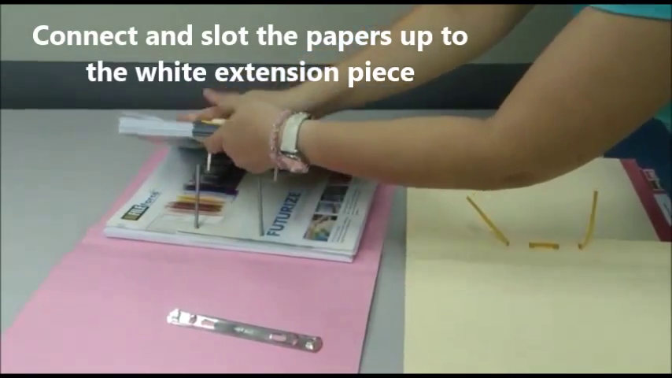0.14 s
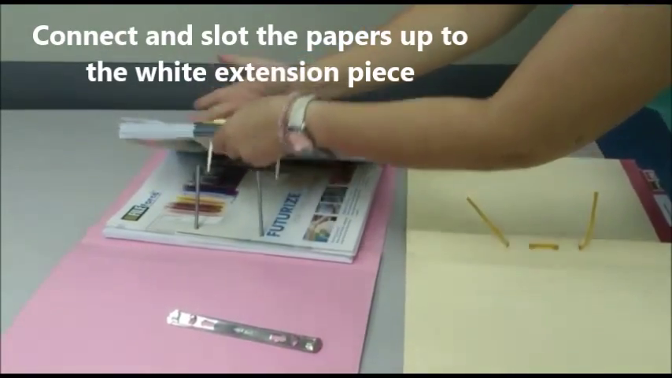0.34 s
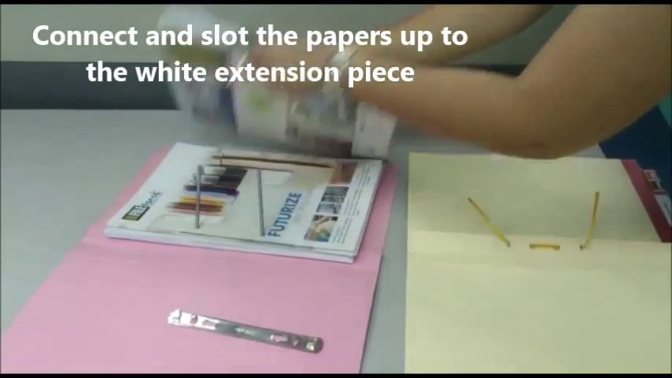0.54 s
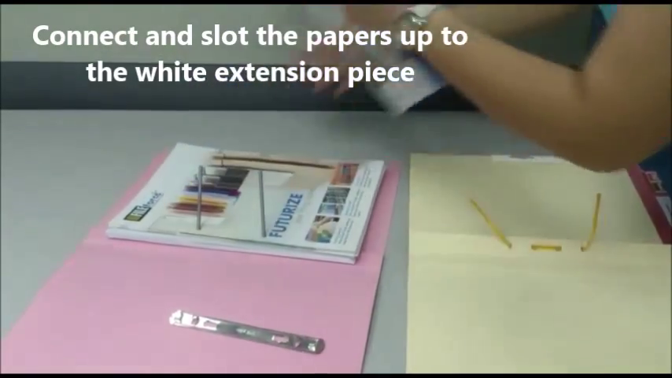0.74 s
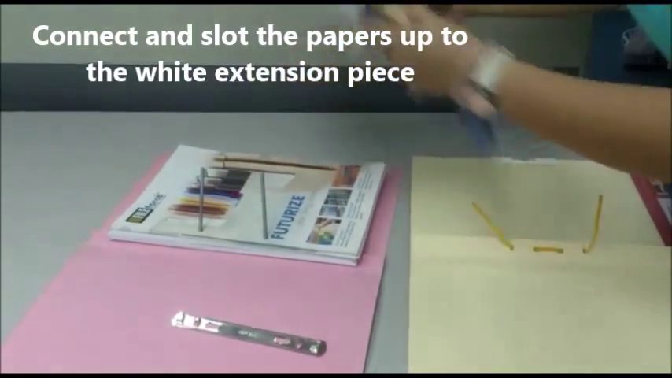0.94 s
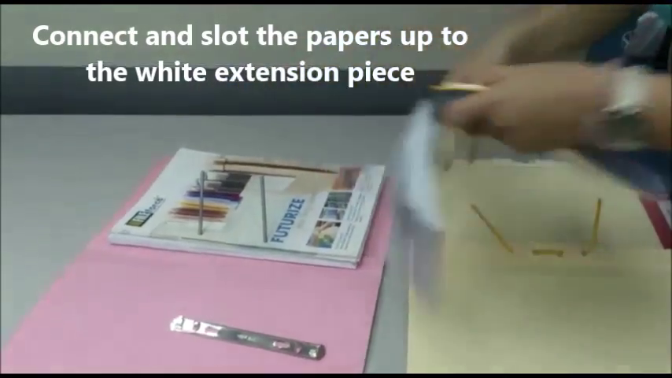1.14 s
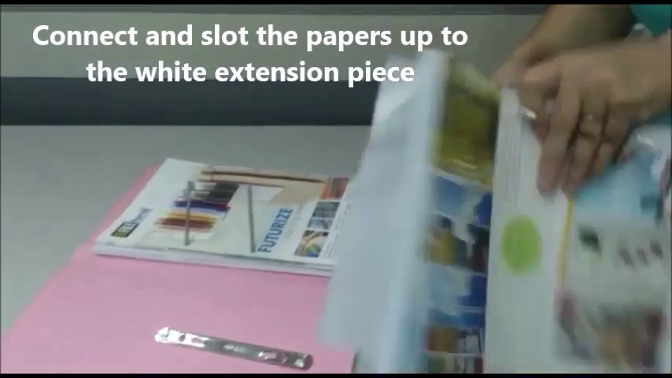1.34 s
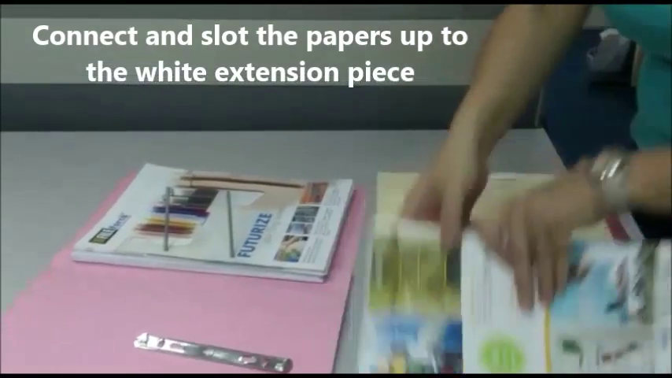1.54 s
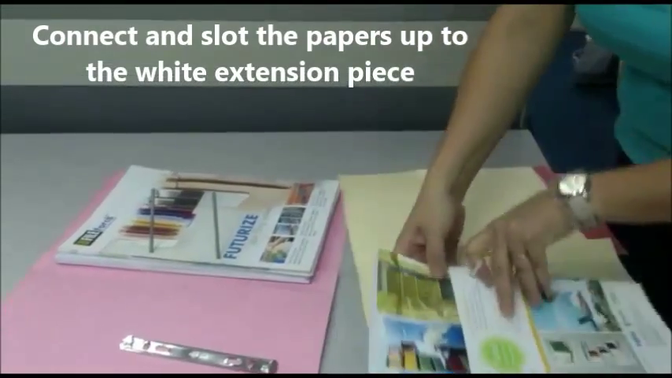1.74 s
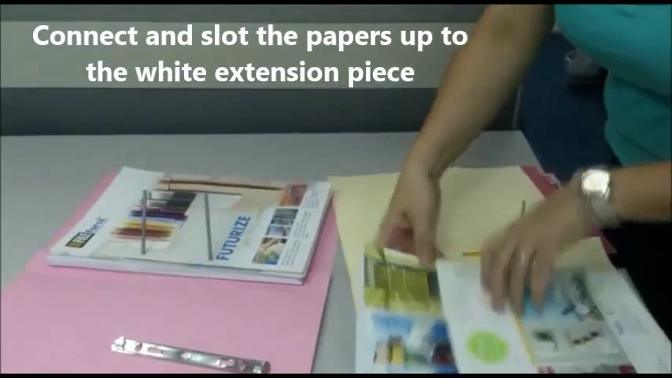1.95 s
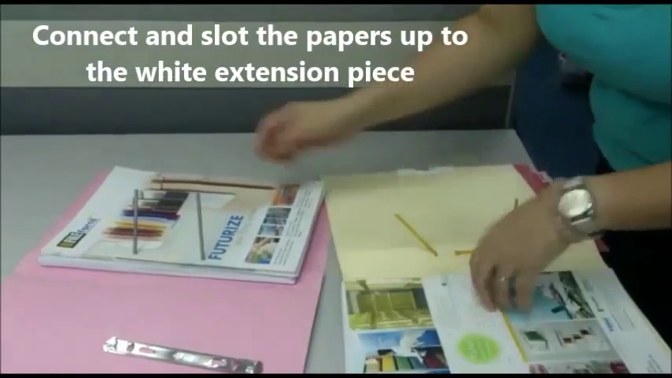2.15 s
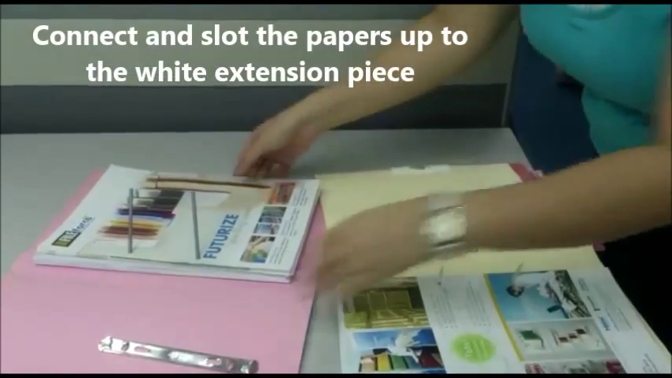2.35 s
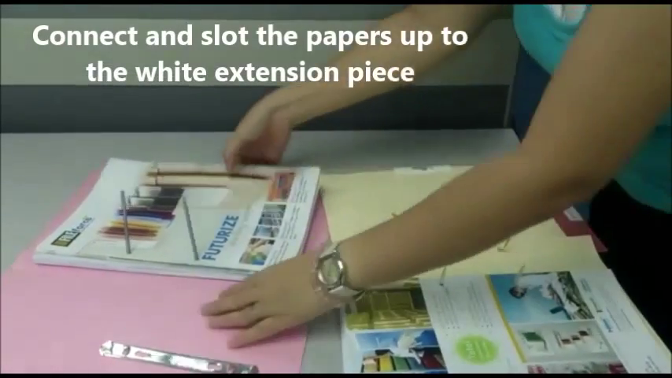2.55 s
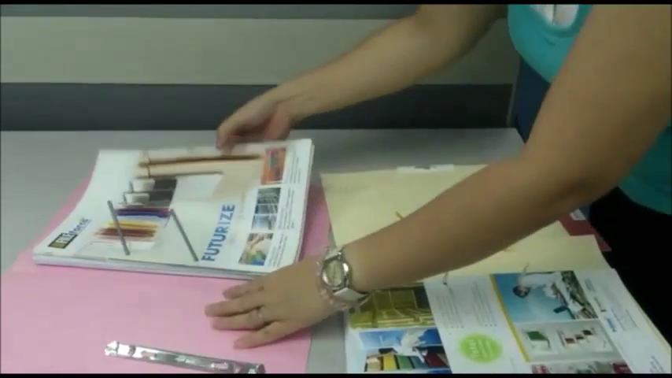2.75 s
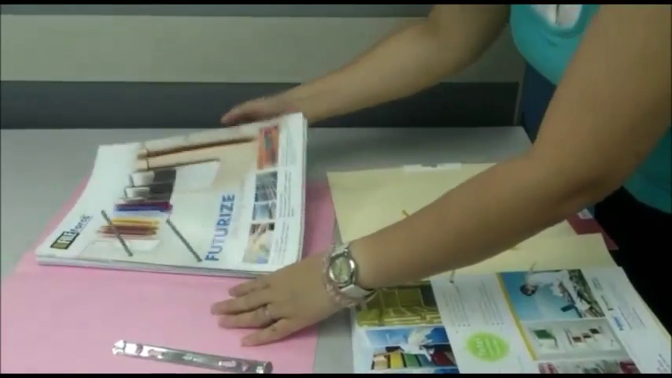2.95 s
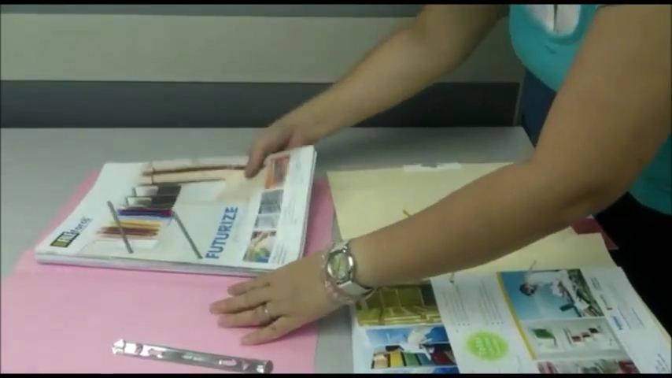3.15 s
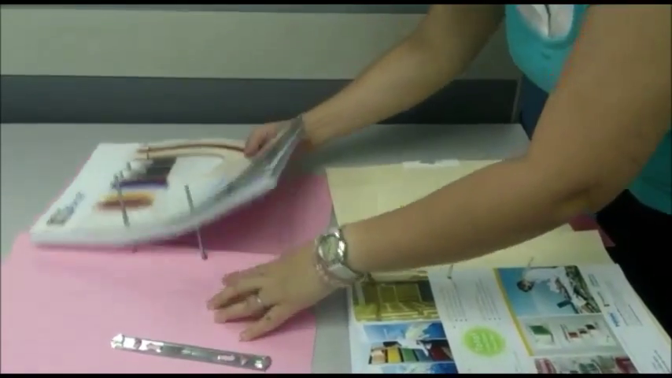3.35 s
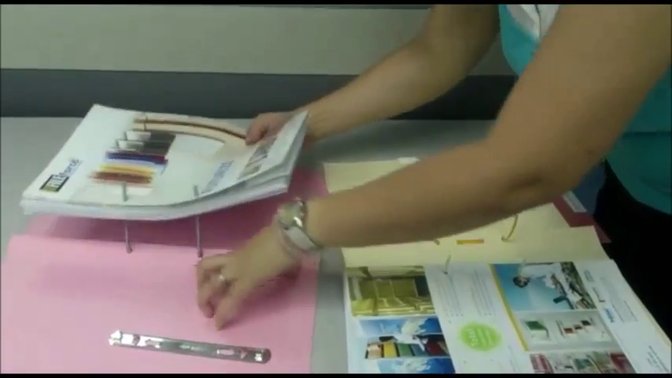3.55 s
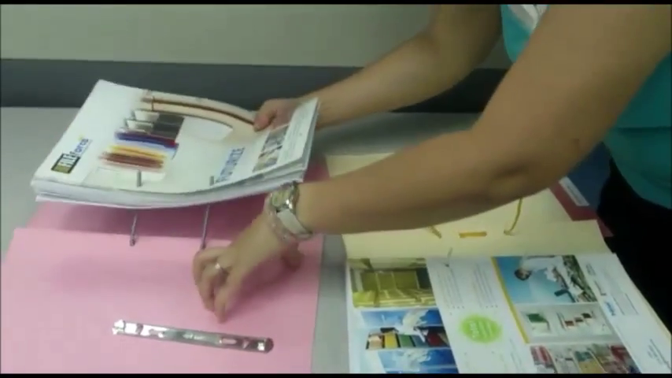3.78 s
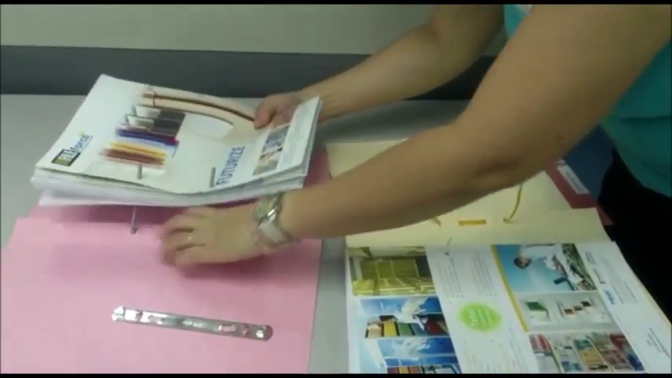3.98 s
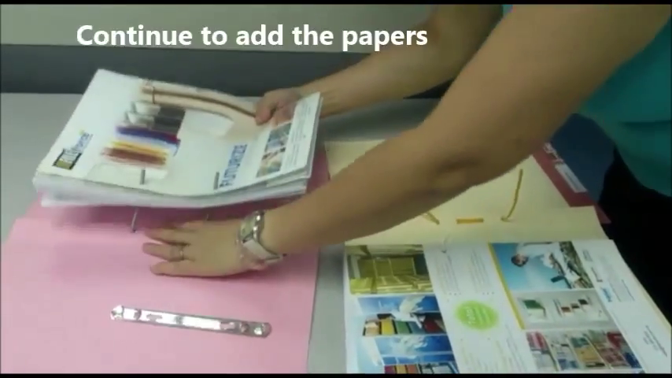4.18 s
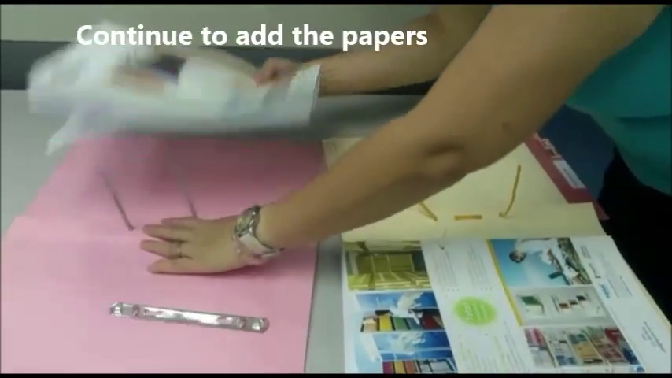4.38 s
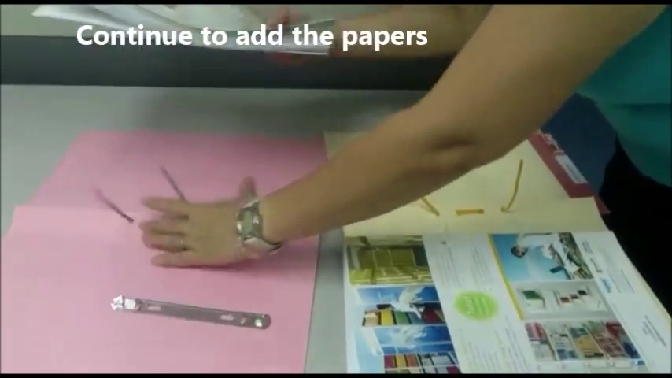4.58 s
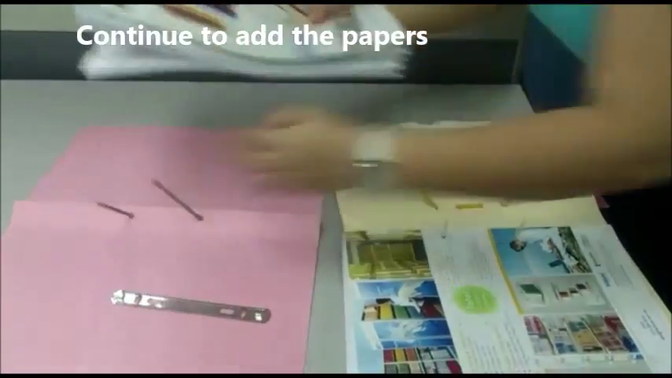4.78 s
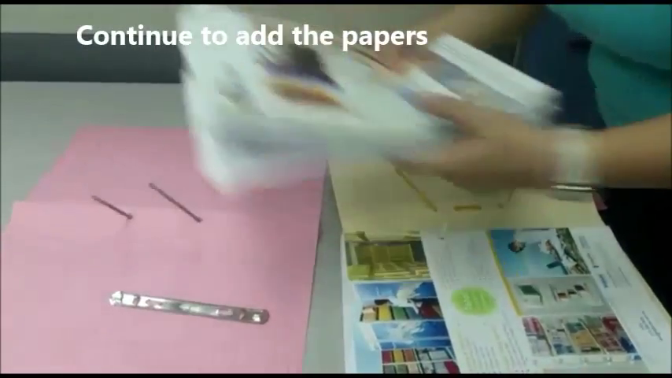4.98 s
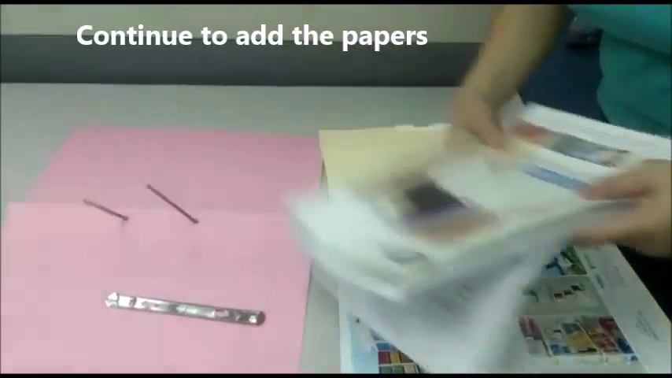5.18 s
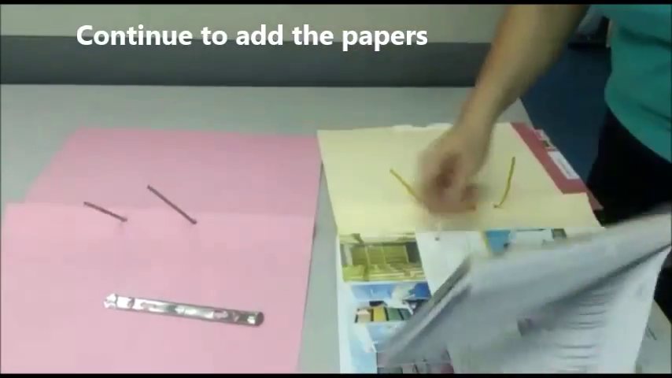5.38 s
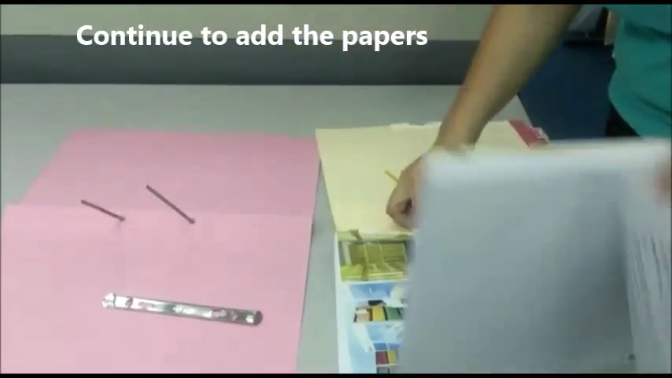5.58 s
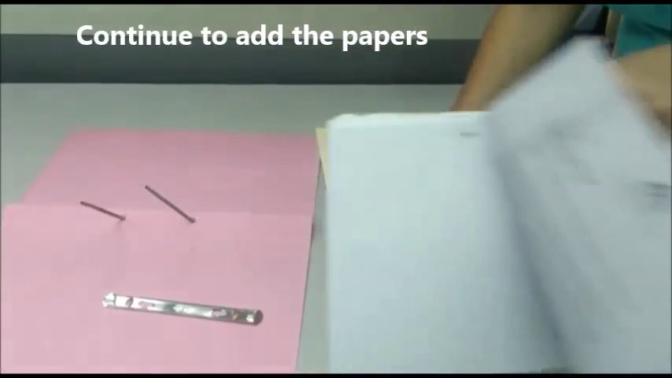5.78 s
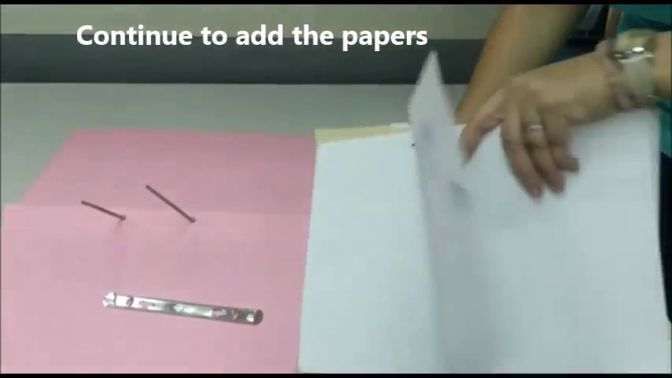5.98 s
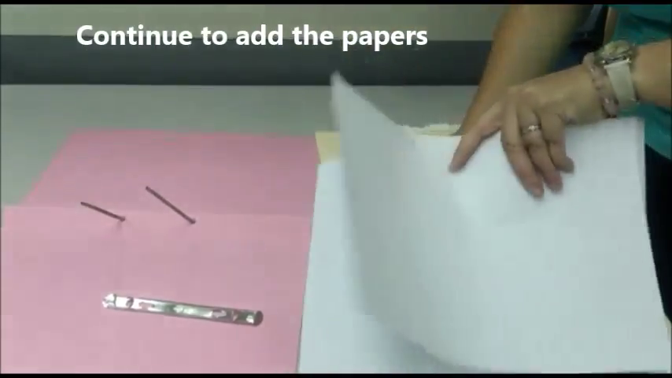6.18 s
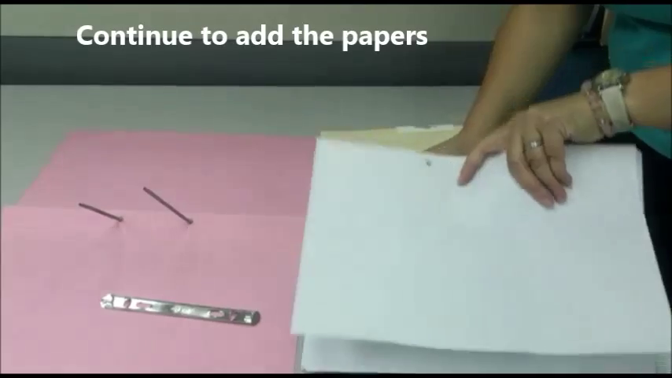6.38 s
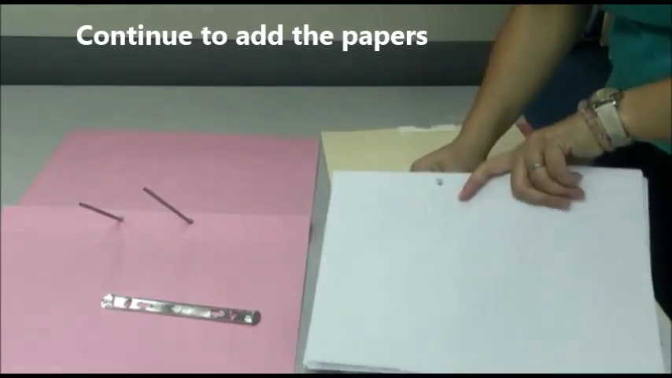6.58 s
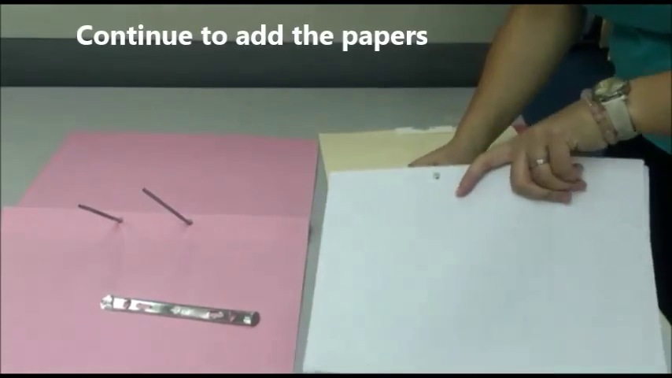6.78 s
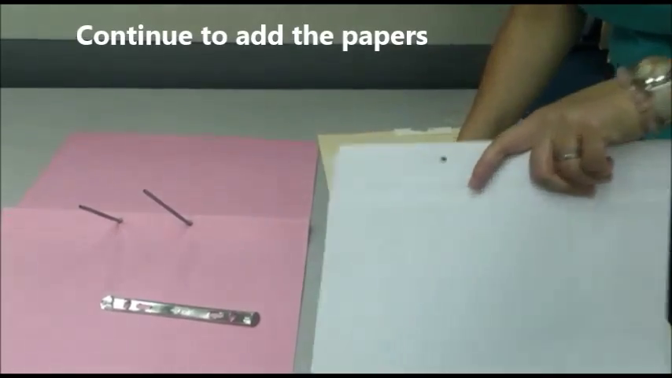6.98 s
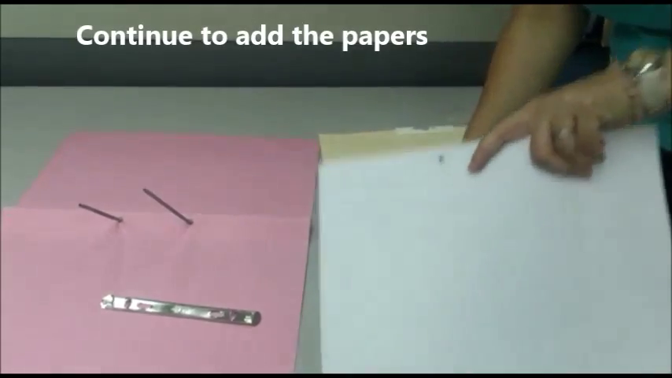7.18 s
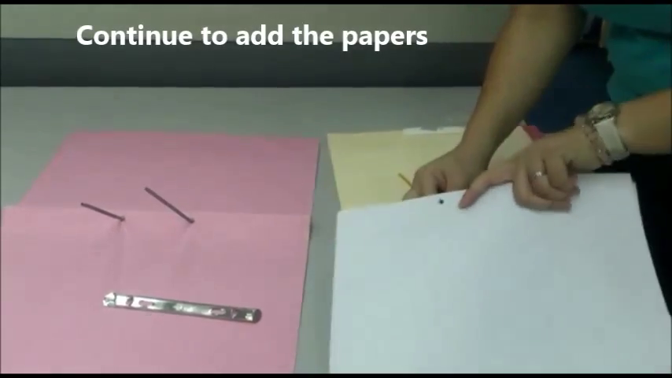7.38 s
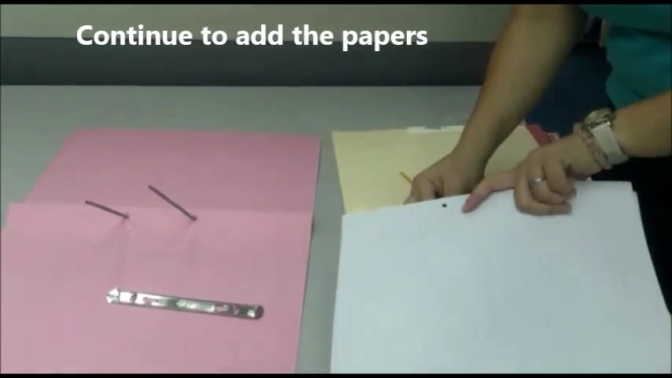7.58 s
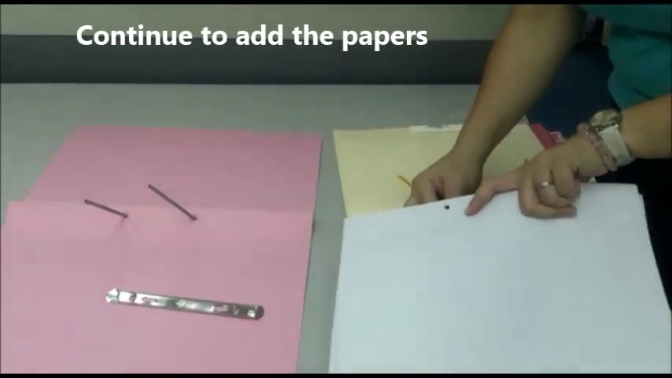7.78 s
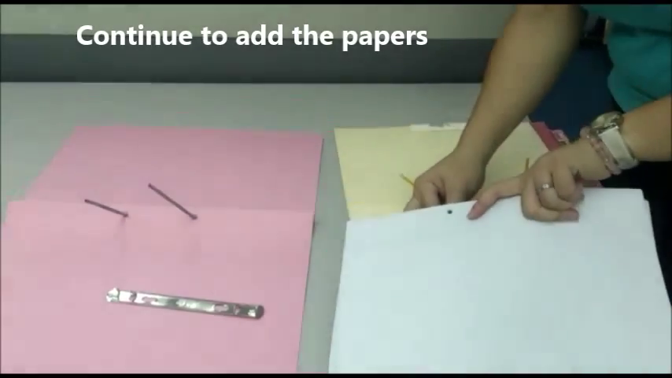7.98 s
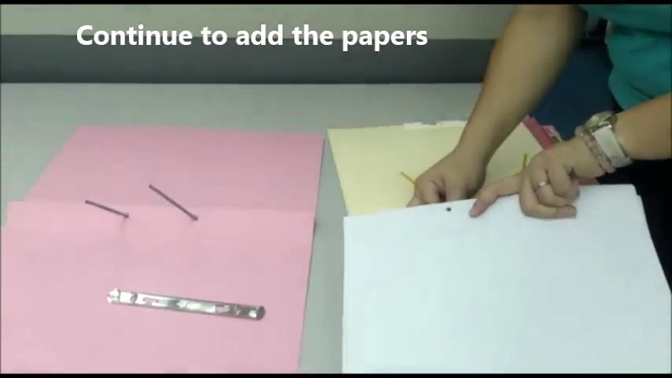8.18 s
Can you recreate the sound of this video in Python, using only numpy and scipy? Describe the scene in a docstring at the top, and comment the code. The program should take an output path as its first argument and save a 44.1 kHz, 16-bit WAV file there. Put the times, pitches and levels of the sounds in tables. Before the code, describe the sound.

Close to a small microphone in a furnished office, paper is shuffled with soft rustles and ticks. Just before two seconds a stack slaps down very loudly and the desk booms. Lighter snaps follow, then a stack groans and creaks off metal prongs, then scrapes and squeaks. The rest is quiet sheet rustling and small clicks over a low motor hum and faint air hiss.

```python
"""An office desk in a furnished room: stacks of paper and catalogues are handled close to a small microphone.
Sheets slide and rustle (shaped noise), snap and slap (clicks with short noise bursts) and pop (puffs of noise).
A stack is slapped down, so the desk booms; another squeaks and creaks off two metal prongs (gliding and dying tones).
A motor hums (overtones and twin tones), air hisses (noise), and the room answers with dying echoes."""
import sys
import numpy as np
from scipy import signal
from scipy.fft import rfft, irfft, next_fast_len
from scipy.io import wavfile
from scipy.ndimage import uniform_filter1d, map_coordinates

SR = 44100
rng = np.random.default_rng(int(sys.argv[2]) if len(sys.argv) > 2 else 0)


def materialize(psi):
    """Save the field psi as 16-bit PCM at rate SR to the path in sys.argv[1].

    A 1-D psi becomes a single channel; in a 2-D psi each row is a channel.
    """
    bounded = np.clip(np.atleast_2d(psi).T, -1, 1)
    quanta = np.round(bounded * 32767).astype(np.int16)
    wavfile.write(sys.argv[1], SR, quanta)


N = 362943  # length of the scene in samples

# Tone colour of the crisp edge of paper: pitch_hz [Hz], level_db [relative dB per Hz]
SHEEN = [(2060, -23), (3500, -17.5), (4920, -14), (6330, -8), (7090, -4.5), (9010, -9), (9850, -19.5),
         (14600, -30.5), (15800, -29.5)]
# Tone colour of a bending stack: pitch_hz [Hz], level_db [relative dB per Hz]
BODY = [(350, -14.5), (600, -12.5), (793, -17), (950, -6), (1260, -3), (1630, 0), (2300, -4), (3500, -15),
        (6000, -16.5), (7800, -60.5)]
# Tone colour of air pushed from between sheets: pitch_hz [Hz], level_db [relative dB per Hz]
FLAP = [(150, -16), (250, -2), (360, 1.5), (468, 2.5), (618, -3.5), (900, -6.5), (1170, -16), (1980, -120)]


def amp(db):
    """Turns decibels into a plain gain."""
    return 10 ** (np.asarray(db) / 20)


def unit(x):
    """Scales a sound to an average strength (rms) of 1."""
    return x / np.sqrt(np.mean(x ** 2) + 1e-20)


def along(points, hz):
    """Reads a curve of (Hz, value) points, joined by straight lines on a log pitch axis."""
    point_hz, value = np.transpose(points)
    return np.interp(np.log(hz + 1), np.log(point_hz + 1), value)


def curves(rows):
    """Joins timed rows by straight lines: one value per sample for each column after the time."""
    seconds, *columns = np.transpose(rows)
    return [np.interp(np.arange(N) / SR, seconds, column) for column in columns]


def wobble(rate):
    """A smooth random curve through `rate` random points a second."""
    points = rng.standard_normal(int(N * rate / SR) + 4)
    return map_coordinates(points, [np.arange(N) * rate / SR])


def filtered(x, response):
    """Multiplies each frequency of x by a gain that depends on its pitch."""
    size = next_fast_len(N + SR // 2)
    spectrum = rfft(x, size) * response(np.fft.rfftfreq(size, 1 / SR))
    return irfft(spectrum, size)[..., :N]


def noise(spectrum, patchy_db):
    """Coloured noise of rms 1 with small, short patches of random gain, like passing resonances."""
    z = signal.stft(rng.standard_normal(N + 512), nperseg=512)[2]
    field = uniform_filter1d(rng.standard_normal(z.shape), size=5, axis=0)  # blur across pitch
    field = uniform_filter1d(field, size=4, axis=1)  # blur across time
    patchy = signal.istft(z * amp(patchy_db * unit(field)), nperseg=512)[1][:N]
    return unit(filtered(patchy, lambda hz: amp(along(spectrum, hz))))


def add(track, s, sound):
    """Lays a sound into the track at s seconds, cut off at the end of the track."""
    part = track[round(s * SR):][:len(sound)]
    part += sound[:len(part)]


def ring(hz, t60, attack):
    """A half-second tone that swells quickly and dies away by 60 dB in t60 seconds."""
    t = np.arange(SR // 2) / SR
    return amp(-60 * t / t60) * np.sin(2 * np.pi * hz * t) * (1 - np.exp(-t / attack))


def strokes(rows):
    """Gain per sample for each layer: a stroke climbs to its peak and dies away; powers add."""
    range_db = 20  # climbed in the rise time, lost again in the fall time
    t, power = np.arange(N) / SR, np.zeros((3, N))
    for s, rise, fall, *peaks_db in rows:
        near = slice(max(round((s - 3 * rise) * SR), 0), round((s + 4 * fall) * SR))
        late = t[near] - s
        slope = np.where(late < 0, late / max(rise, .003), -late / max(fall, .01))
        power[:, near] += amp(np.c_[peaks_db] + range_db * slope) ** 2
    return np.sqrt(power)


def struck(blows, spectrum):
    """Turns single pushes into coloured pulses; nothing sounds before the push."""
    # Folding the log spectrum's echo onto positive times packs the pulse right after its start.
    fold = irfft(np.log(amp(along(spectrum, np.fft.rfftfreq(4096, 1 / SR))) + 1e-4))
    fold[1:2048] *= 2
    fold[2049:] = 0
    pulse = irfft(np.exp(rfft(fold)))
    return signal.fftconvolve(blows, pulse / np.abs(pulse).max())[:N]


def rustle():
    """Sheets stick and slip: clumps of tiny buckles roughen the noise of hiss, scrape and flap at once."""
    # Sliding sheets, one row a stroke: peak_s, rise_s, fall_s [s], hiss_db, scrape_db, flap_db [dB]
    sliding_sheets = [(.15, 0.028, 0.15, -64, -53.5, -49), (.2, 0.059, 0.1, -60, -53.5, -45.5),
                      (.3, 0.21, 0.13, -52, -56.5, -49), (.77, 0.082, 0.062, -60, -57, -73),
                      (1.14, 0.15, 0.17, -54.5, -62.5, -69), (1.37, 0.081, 0.026, -49.5, -59.5, -78),
                      (1.55, 0.047, 0.083, -49.5, -55.5, -59.5), (1.76, 0.26, 0.065, -53, -60, -58.5),
                      (1.822, 0.015, 0.14, -21, -25, -28.5), (2.25, 0.037, 0.13, -41, -38, -41.5),
                      (2.56, 0.033, 0.081, -53, -71, -79), (2.75, 0.03, 0.2, -44.5, -53, -77),
                      (2.88, 0.11, 0.11, -49.5, -53, -83), (3.0, 0.059, 0.16, -49, -61, -76),
                      (3.08, 0.043, 0.07, -49, -46.5, -54), (3.3, 0.043, 0.042, -48.5, -52.5, -55),
                      (3.53, 0.05, 0.059, -50.5, -53, -41.5), (3.59, 0.029, 0.14, -41.5, -34.5, -31.5),
                      (3.67, 0.14, 0.069, -51, -37.5, -51), (3.785, 0.036, 0.13, -50, -42.5, -50.5),
                      (3.95, 0.078, 0.092, -55.5, -51.5, -45.5), (4.18, 0.14, 0.13, -50, -61, -59.5),
                      (4.525, 0.051, 0.15, -39.5, -29, -40.5), (4.572, 0.048, 0.043, -38.5, -27.5, -49),
                      (5.38, 0.049, 0.35, -57, -81.5, -72.5), (5.515, 0.068, 0.097, -49.5, -64, -73),
                      (5.645, 0.089, 0.18, -69, -54, -80), (.6, 0.033, 0.047, -48, -79, -59.5),
                      (6.13, 0.047, 0.28, -55.5, -56.5, -85), (6.71, 0.1, 0.15, -49.5, -57, -59),
                      (7.17, 0.11, 0.17, -53, -58, -60), (7.52, 0.04, 0.11, -55, -48.5, -49),
                      (7.6, 0.22, 0.16, -51, -60, -62)]
    # Smooth sheets slide off each other: peak_s, rise_s, fall_s [s], level_db [dB]
    smooth_slides = [(6.650, 0.2, .08, -42), (7.330, 0.26, .2, -54.5)]
    # Narrow hiss of gliding sheets: pitch_hz [Hz], level_db [relative dB per Hz]
    whisper_colour = [(6200, -20.5), (7300, 2), (9200, -10.5), (10500, -28)]
    hiss_gain, scrape_gain, flap_gain = strokes(sliding_sheets)
    clumps = 0.465 * wobble(40) + 0.9 * wobble(130)  # dB
    hiss = unit(amp(clumps + 1.8 * wobble(700)) * noise(SHEEN, patchy_db=2.5))
    scrape_db = clumps + 0.68 * wobble(200) + 1.9 * wobble(1500)
    scrape = unit(amp(scrape_db) * noise(BODY, patchy_db=3.2))
    flap = unit(amp(1.4 * clumps) * noise(FLAP, patchy_db=5.0))
    glide = strokes(smooth_slides)[0] * noise(whisper_colour, patchy_db=1.0)
    return hiss_gain * hiss + scrape_gain * scrape + flap_gain * flap + glide


def snaps():
    """Each snap is a click and a burst; harder ones are more sudden, and the stack's body lags the edge."""
    # Paper snaps and slaps: start_s [s], level_db [dB before the offsets below],
    # body_db, fizz_db [dB relative to level_db, before the offsets below]
    snap_list = [(0.219, -33, -17, -4), (0.255, -23.5, -11.5, -8), (0.33, -39, -2, -4),
                 (0.578, -28, -10, -5), (1.355, -27, -22, -23), (1.584, -28, -20, -22.5),
                 (1.7315, -30, -23, -12), (1.801, 4, -44, -31.5), (1.8046, 2, -13.5, -29.5),
                 (1.8077, -3.5, -9, -32.5), (1.813, -7, -9.5, -26), (1.8176, -4, -30, -30),
                 (1.828, -5, -19.5, -28), (1.8529, -15.5, -2, -30), (2.124, -25, -17, -33),
                 (2.2008, -25, -25, -25), (2.2238, -17, -31, -24), (2.23, -19, -12, -26),
                 (2.235, -10.5, -0.5, -23), (2.543, -25.5, -20.5, -17), (2.722, -26, -36, -15),
                 (2.743, -25, -22, -15), (2.978, -30.5, -7, -14), (3.059, -25, -6, -7),
                 (3.284, -32, -7.5, -15), (3.5769, -24, 2.5, -14), (4.177, -31, -30, -21),
                 (4.491, -36, -3, -21), (5.365, -37, -24, -4), (5.6185, -26, -23, -22),
                 (6.686, -27.5, -36, -17), (6.695, -20, -35, -18.5), (6.7057, -29, -31, -20),
                 (6.734, -30, -25, -13), (7.1498, -32, -5.5, -27), (7.176, -30, -20, -17),
                 (7.503, -24, -25, -19), (7.51, -39, 0.5, -20), (7.567, -28, -23, -18)]
    # Highest treble of a thin sheet's crack: pitch_hz [Hz], level_db [relative dB per Hz]
    fizz_colour = [(8500, -38.5), (10000, -3), (12500, 3), (15800, -0.5)]
    t = np.arange(SR // 10) / SR
    edge, body, fizz, tick, tock = np.zeros((5, N))
    for s, db, body_db, fizz_db in snap_list:
        slow = 2.5 + max(-db, 0) / 26  # soft snaps stretch in time
        crack = amp(db - 8.5 - 60 * t / (0.0077 * slow)) * (1 - np.exp(-t / (0.00012 * slow ** 2)))
        add(edge, s, crack)
        add(tick, s + 0.00047, [amp(1.12 * db - 5.5)])
        add(tock, s + .0006, [amp(1.32 * db + body_db + 2.5)])
        fizz_tail = amp(db + fizz_db - 17.0 - 60 * t / 0.1) * (1 - np.exp(-t / .004))
        add(fizz, s, amp(fizz_db) * crack + fizz_tail)
        body_fall = amp(db + body_db + 3.5 - 60 * t / (0.0092 * slow))
        add(body, s, body_fall * (1 - np.exp(-t / (0.0016 * slow))))
    clicks = struck(tick, SHEEN) + struck(tock, BODY)
    bursts = edge * noise(SHEEN, patchy_db=1.5) + body * noise(BODY, patchy_db=-6.0)
    return clicks + bursts + fizz * noise(fizz_colour, patchy_db=1.5)


def pops():
    """Each pop is a puff of noise in a broad resonance, with a faint crisp edge."""
    # Dull pops of a stack's edge catching or landing, each at its own pitch: start_s [s], level_db [dB],
    # pitch_hz [Hz], t60_s [s to fall by 60 dB]
    pop_list = [(1.357, -39, 2900, 0.044), (2.0113, -25, 1140, 0.038), (2.918, -39, 1820, 0.038),
                (3.063, -31, 2740, 0.05), (3.4962, -40.5, 1600, 0.037), (3.9401, -26.5, 1500, 0.026),
                (4.447, -27, 2000, 0.018), (4.4616, -29.5, 2190, 0.015), (4.478, -27, 2000, 0.019),
                (5.452, -48, 1800, 0.091), (5.505, -40.5, 2420, 0.072), (5.6317, -31, 1870, 0.035),
                (7.4989, -28.5, 3030, 0.0093)]
    t, track, edge = np.arange(SR // 10) / SR, np.zeros(N), np.zeros(N)
    for s, db, hz, t60 in pop_list:
        puff = rng.standard_normal(len(t))
        shape = amp(db - 60 * t / t60) * (1 - np.exp(-t / (0.075 * t60)))
        band = signal.butter(2, [hz / 1.72, hz * 1.38], "band", fs=SR, output="sos")
        add(track, s, shape * unit(signal.sosfilt(band, puff)))
        add(edge, s, amp(-11) * shape)
    return track + edge * noise(SHEEN, patchy_db=2.0)


def thumps():
    """Blows make the desk top boom in its own set of tones and squeeze out a puff of air."""
    # Blows into the desk top: start_s [s], level_db [dB before tone levels and offsets],
    # ring_share [part of the free ring time left by a resting hand],
    # hardness_db [dB per octave of tone pitch, zero at 120 Hz]
    blow_list = [(1.81, -20.5, 0.58, 2), (1.849, -25, 0.33, 0), (2.012, -37, 0.15, 2),
                 (2.2364, -35.5, 0.39, 6.5), (2.98, -49.5, 0.48, 2.5), (3.65, -31.5, 0.14, -12),
                 (4.121, -41, 0.22, -10), (4.2, -44, 0.21, -6.5), (4.262, -40.5, 0.17, -11),
                 (7.509, -36, 0.32, 2)]
    # Tones of the desk top: pitch_hz [Hz], level_db [relative dB], t60_s [free ring time, s]
    desk_tones = [(69.4, -7, 0.34), (83, -4, 0.55), (117.5, 3, 0.38), (152, 0.5, 0.28), (210.4, -7, 0.51),
                  (253.4, -11, 0.6), (296.7, -7.5, 0.58), (362, 8, 0.093), (434.4, -11.5, 0.34)]
    track, puff = np.zeros((2, N))
    for s, db, share, hard_db in blow_list:
        add(puff, s, [amp(db + 1.5 + 1.7 * hard_db)])  # air squeezed out at the contact
        for hz, mode_db, t60 in desk_tones:
            # each blow finds each tone at a new random strength
            tone_db = db + mode_db + hard_db * np.log2(hz / 120) + rng.normal()
            add(track, s, amp(tone_db) * ring(hz, t60 * share, attack=0.0047))
    return track + struck(puff, FLAP)


def squeaks():
    """Punched holes drag along the prongs: hoarse tones that glide while the paper drags."""
    # Drags: start_s [s], length_s [s], level_db [dB before the flutter], first_hz, last_hz [Hz]
    drags = [(3.513, 0.028, -39, 1430, 1850), (4.452, 0.14, -38, 438, 475),
             (4.513, 0.054, -36.5, 1740, 1460), (4.526, 0.058, -31, 658, 949),
             (4.552, 0.033, -41, 1487, 1940)]
    turn_wander = 1.3 * wobble(260)  # radians; makes the tones hoarse
    flutter, track = amp(4 * wobble(200)), np.zeros(N)
    for s, length, db, first_hz, last_hz in drags:
        share = np.arange(round(length * SR)) / (length * SR)
        turn = 2 * np.pi * np.cumsum(first_hz + (last_hz - first_hz) * share) / SR
        turn = turn + turn_wander[round(s * SR):][:len(turn)]
        add(track, s, amp(db) * np.sqrt(np.sin(np.pi * share)) * np.sin(turn))
    return track * flutter


def creaks():
    """The stack slips on the prongs: each slip groans as a short dying tone."""
    # Slips: start_s [s], level_db [dB], pitch_hz [Hz]
    slips = [(3.619, -19, 492), (3.644, -13.5, 450), (3.662, -17.5, 454), (3.682, -32, 468),
             (3.717, -35, 440), (3.784, -27.5, 460), (3.83, -25.5, 455), (3.868, -22.5, 434)]
    track = np.zeros(N)
    for s, db, hz in slips:
        add(track, s, amp(db) * ring(hz, t60=0.044, attack=0.0051))
    return track


def clinks():
    """Small metal rings in faint, fluttering tones that die away."""
    # Thin rings, perhaps a fastener or bracelet: start_s [s], level_db [dB before the flutter], pitch_hz [Hz]
    thin_rings = [(.143, -52, 1113), (1.19, -63, 5200), (1.21, -62, 2820), (1.25, -62, 1120),
                  (1.53, -61, 1380), (1.569, -57, 2610), (1.67, -60, 1007)]
    track = np.zeros(N)
    for s, db, hz in thin_rings:
        add(track, s, amp(db) * ring(hz, t60=0.36, attack=0.0044))
    return track * amp(5.7 * wobble(46.8))


def room(x):
    """Each frequency of the room's answer, an echo of random noise, dies at its own speed."""
    # How long the room rings: pitch_hz [Hz], t60_s [s to fall by 60 dB]
    ring_times = [(200, 0.48), (2000, 0.37), (8000, 0.2), (15000, 0.27)]
    hz, t, z = signal.stft(rng.standard_normal((3, SR // 2)), SR, nperseg=256)
    fall = amp(-60 * t / along(ring_times, hz)[:, None])
    tails = signal.istft(z * fall, SR, nperseg=256)[1]
    tails = tails / np.linalg.norm(tails[0])
    # the echo passes steadily around three random tails, so no single ringing tone stands out
    shares = np.cos(np.pi * (20 * np.arange(N) / SR + np.c_[:3] / 3)) * np.sqrt(2 / 3)
    delayed = np.pad(x * shares, ((0, 0), (300, 0)))  # the answer starts 300 samples late
    return signal.fftconvolve(delayed, tails, axes=1).sum(0)[:N]


def background():
    """The motor's beat with its overtones, some throbbing against a twin tone, over rushing air."""
    # Hum and hiss swell and sink together: time_s [s], level_db [dB, base level of the hum]
    swell = [(0.0, -50.5), (0.16, -51), (1.79, -49.5), (1.9, -40), (2.18, -47.5), (3.53, -49.5),
             (3.62, -45), (4.17, -50.5), (4.7, -45.5), (5.02, -53.5), (5.8, -48), (6.07, -51.5),
             (6.74, -47), (7.15, -50.5), (7.68, -47), (8.23, -51)]
    # Hum tones: multiple [times the motor's beat], level_db [dB above the base level],
    # twin_db [same, for a twin tone one slip beat higher]
    hum_tones = [(1, 3, -34), (2, -19, -37.5), (3, -3.5, -34), (4, -23.5, -14.5), (5, -13, -35.5),
                 (6, -24.5, -27.5), (10, -27.5, -36)]
    # Tone colour of the air: pitch_hz [Hz], level_db [relative dB per Hz]
    air_colour = [(30, -34.5), (60, -1), (100, -8), (220, -9), (480, -13), (630, -25), (2800, -24),
                  (4730, -29.5), (6600, -25.5), (7350, -17), (8000, -22.5), (9300, -25), (11000, -34.5),
                  (15800, -35.5)]
    motor_hz, slip_hz = 47.88, 4.15  # beat and slip beat of the motor
    level_db, = curves(swell)
    turn, slip = 2 * np.pi * np.arange(N) / SR * [[motor_hz], [slip_hz]]
    turn = turn + .01 * wobble(3)
    hum = np.zeros(N)
    for k, db, twin_db in hum_tones:
        sign = 1 if k > 1 else -1  # overtones pulse in step, the lowest tone swings against them
        hum += sign * (amp(db) * np.sin(k * turn) + amp(twin_db) * np.sin(k * turn + slip))
    # the hiss swells less than the hum
    air_db = -55.0 + 0.87 * (level_db - level_db.mean()) + 0.11 * wobble(13.0)
    air = amp(air_db) * noise(air_colour, patchy_db=2.3)
    return np.sqrt(2) * amp(level_db) * hum + air


def scene():
    """Handling sounds near and through the room, over the background."""
    slides = rustle() + squeaks()
    blows = snaps() + pops() + thumps() + creaks() + clinks()
    answer = room(amp(-7.5) * blows + amp(-10.0) * slides)
    return (slides + blows + answer + background())[None]


def record(dry):
    """Rounds off the loudest peaks; the microphone drops the deepest bass and all above its band limit."""
    top_hz, bass_hz = 15600, 38
    soft = dry / (1 + np.abs(dry / 1.02) ** 6) ** (1 / 6)
    return filtered(soft, lambda hz: (hz < top_hz) / (1 + (bass_hz / (hz + 1)) ** 6))


dry = scene()
out = record(dry)
materialize(out)
```